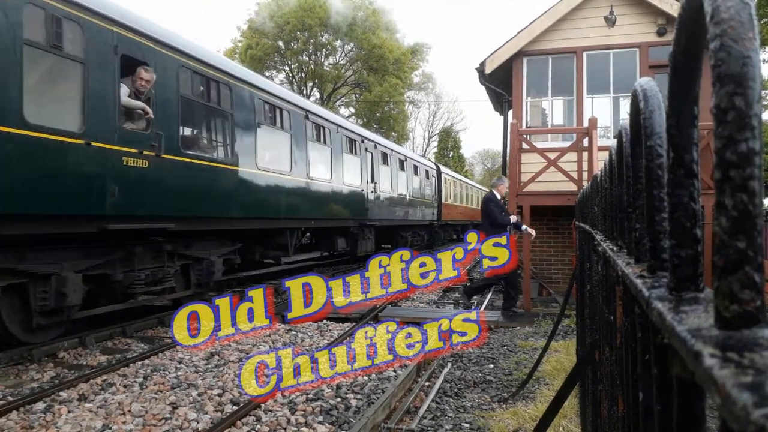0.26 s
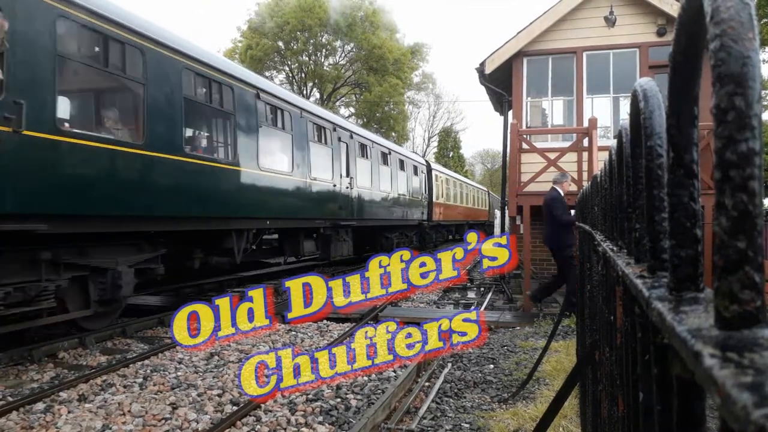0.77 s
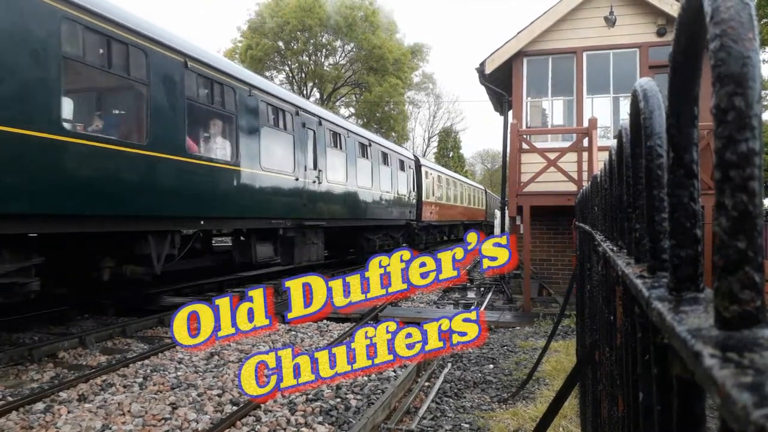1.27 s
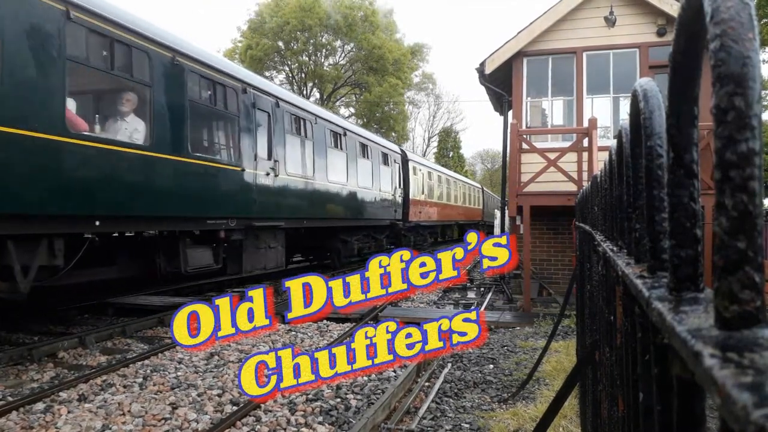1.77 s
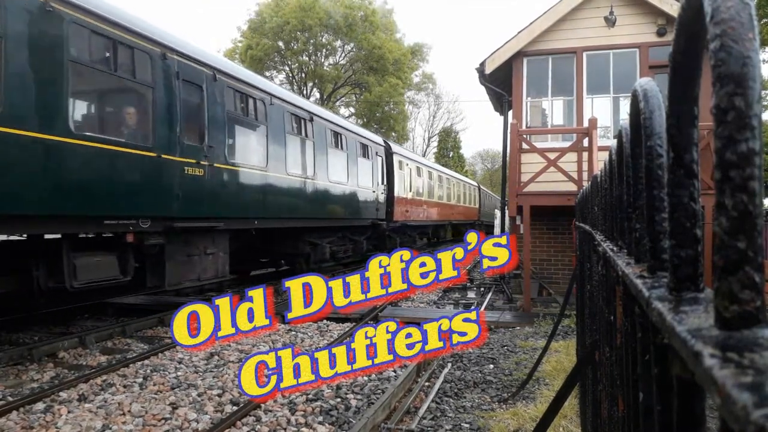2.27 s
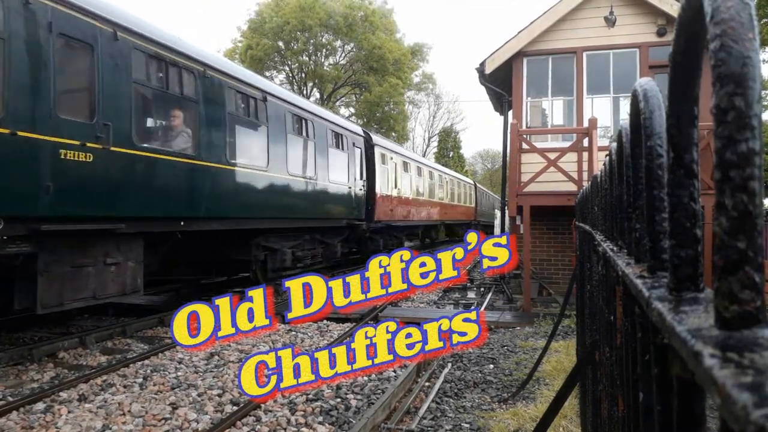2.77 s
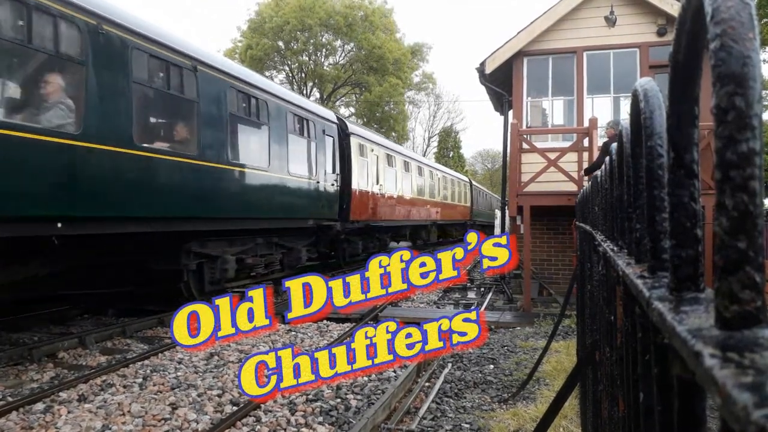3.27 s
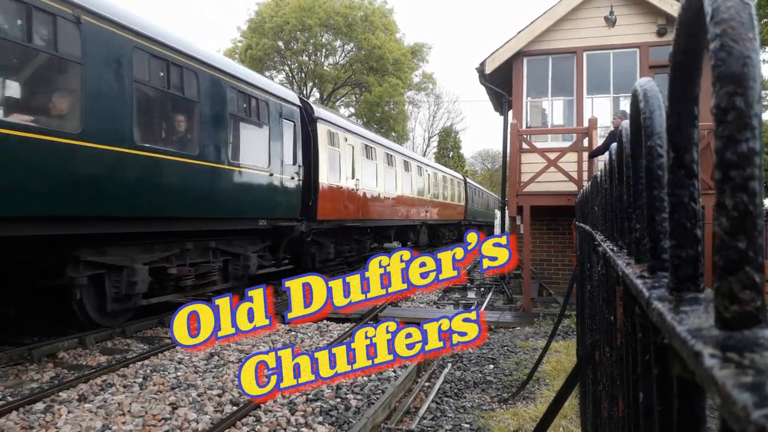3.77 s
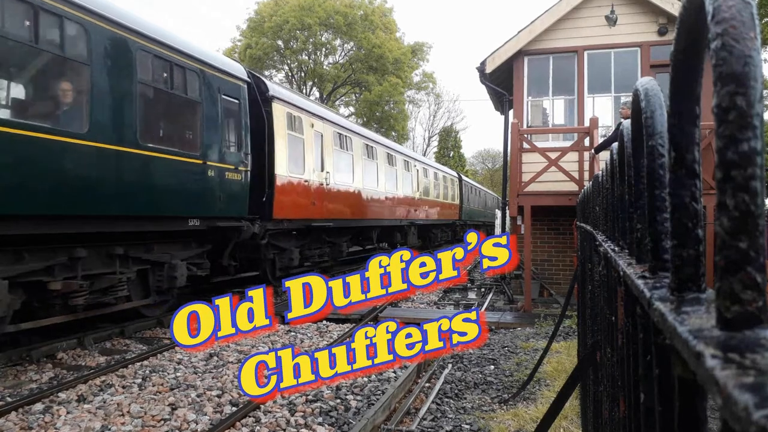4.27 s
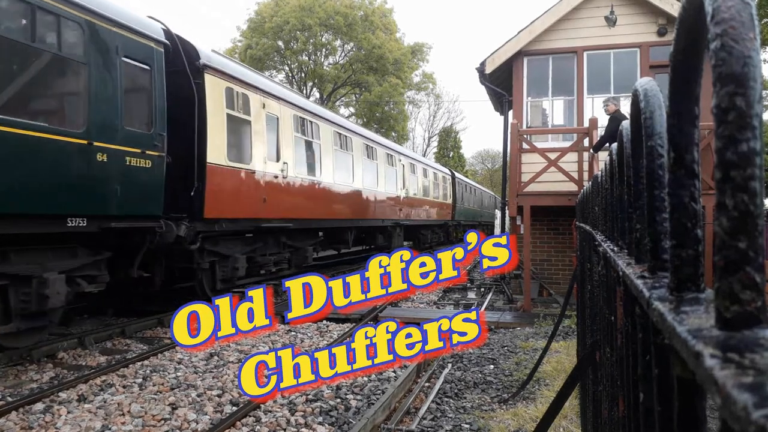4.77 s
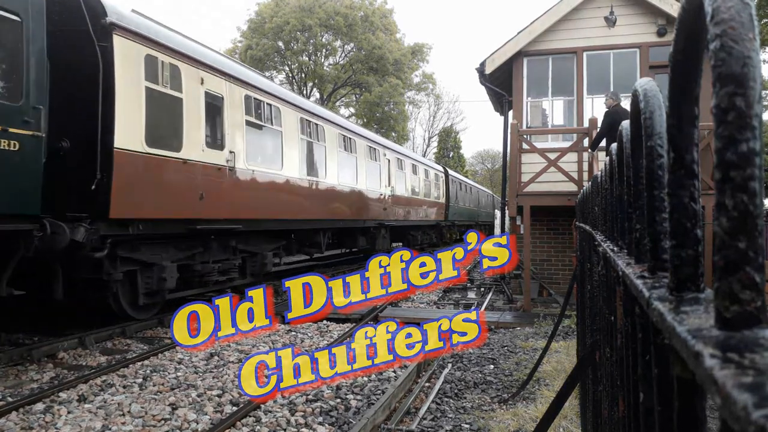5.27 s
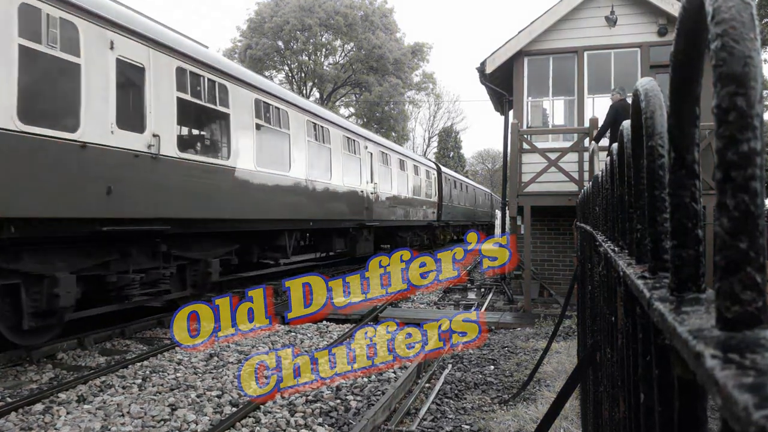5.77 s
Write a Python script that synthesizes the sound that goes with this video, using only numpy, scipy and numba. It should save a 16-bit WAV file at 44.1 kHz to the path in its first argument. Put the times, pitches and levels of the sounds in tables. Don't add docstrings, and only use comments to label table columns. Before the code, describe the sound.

A steam locomotive pulls away with strong, regular chuffs, hissing and booming, gradually growing fainter over the soft rumble of rolling coaches.

```python
import sys
import numpy as np
from scipy import signal
from scipy.fft import rfft, irfft
from scipy.io import wavfile
from scipy.ndimage import uniform_filter1d
from numba import njit

SR = 44100
rng = np.random.default_rng(int(sys.argv[2]) if len(sys.argv) > 2 else 0)


def volts_from_db(level):
    exponent = np.asarray(level, float) / 20
    return 10 ** exponent


def dump(signal):
    limited = np.clip(np.atleast_2d(signal).T, -1, 1)
    pcm = np.round(limited * 32767).astype(np.int16)
    wavfile.write(sys.argv[1], SR, pcm)


N = 265923
T = np.arange(N) / SR

# t/s, roar level/dB, time to full pressure/s, chimney boom/dB and low body/dB relative to the roar
BEATS = [(0.043, -20, 0.077, 2.5, -0.5), (0.333, -21.5, 0.067, 1, -0.2), (0.625, -23.5, 0.061, 4, 0.6),
         (0.898, -23.5, 0.054, -3, -3), (1.16, -22.5, 0.085, -1, -3), (1.448, -22.5, 0.07, -2, -5.5),
         (1.723, -26, 0.081, -2.5, -3), (1.99, -28, 0.073, 0, -2.5), (2.265, -27.5, 0.079, -3, -5.5),
         (2.544, -25.5, 0.07, -12, -1), (2.823, -27, 0.067, -4, -3), (3.073, -28.5, 0.078, -1.5, -1.5),
         (3.346, -29.5, 0.079, -1.5, -1.5), (3.638, -30.5, 0.049, -2, 1.5), (3.898, -34.5, 0.073, 0.5, 0.5),
         (4.128, -41, 0.013, -5, 1.5), (4.165, -36, 0.055, 1, 2), (4.413, -36, 0.077, 0, 1),
         (4.673, -33, 0.084, -4.5, 0), (4.957, -32, 0.067, -7.5, 0), (5.205, -33.5, 0.055, -8, 2),
         (5.416, -32, 0.052, -3.5, 2.5), (5.578, -31.5, 0.059, -4, -0.5), (5.745, -34.5, 0.064, -1.5, -0.5)]
BEAT_S, ROAR_DB, _, BOOM_DB, BODY_DB = np.transpose(BEATS)
STRENGTH_DB = ROAR_DB + 29.5
# f/Hz, width/Hz, level/dB
CHIMNEY = [(242.7, 33.7, 1), (267.2, 29, -4)]
GONE_M = 4.7 * T + 1 * T ** 2 / 2


@njit
def svf(x, hz, width):
    y = np.empty(len(x))
    band, low = 0., 0.
    for i in range(len(x)):
        g = np.pi * hz[i] / SR
        k = width / hz[i]
        v = (band + g * (x[i] - low)) / (1 + g * (g + k))
        band = 2 * v - band
        low += 2 * g * v
        y[i] = k * v
    return y


def unit(x):
    return x / np.sqrt(np.mean(x ** 2))


def filtered(x, order, hz, kind):
    return signal.sosfiltfilt(signal.butter(order, hz, kind, fs=SR, output="sos"), x)


def walk(rate):
    hold = int(SR / rate)
    steps = np.repeat(rng.standard_normal(N // hold + 1), hold)
    slewed = uniform_filter1d(uniform_filter1d(steps, hold), hold)
    return unit(slewed[:N])


def turbulence(spectrum, flicker_db, rate):
    hz = np.maximum(np.arange(N // 2 + 1) * SR / N, 1)
    points = np.array(spectrum, float)
    colour_db = np.interp(np.log(hz), np.log(points[:, 0]), points[:, 1], -90)
    colour = rfft(rng.standard_normal(N)) * volts_from_db(colour_db)
    out = 0
    for step in range(9, 29):
        share = np.clip(1 - np.abs(2 * np.log2(hz) - step), 0, 1)
        out = out + irfft(colour * share, N) * volts_from_db(flicker_db * walk(rate))
    return unit(out)


def pipe(modes, drift, flicker_db):
    out = 0
    for hz, width, db in modes:
        centre = hz * (1 + drift * walk(6))
        swing = np.tanh(0.58 * unit(svf(rng.standard_normal(N), centre, 1. * width)))
        ring = svf(swing, centre, 2. * width)
        out = out + volts_from_db(db + flicker_db * walk(20)) * unit(ring)
    return unit(out)


def blast(layer_db, late=0., stretch=0.96, sharpen=0.98):
    width_s, bluntest = 0.047, 0.9
    out = np.zeros(N)
    t = np.arange(SR // 2) / SR
    for (start, db, rise, *_), extra_db in zip(BEATS, layer_db):
        sharp = max((rise / width_s) ** 2, bluntest)
        u = np.maximum(t - late, 0) / (rise * stretch)
        puff = (u * np.exp(1 - u)) ** (sharp * sharpen) * volts_from_db(db + extra_db)
        i = int(start * SR)
        out[i:i + len(t)] += puff[:N - i]
    return out


def leaking_steam():
    # f/Hz, level/dB per Hz
    leak_colour = [(600, -5.5), (1500, -2), (2400, -3), (3300, -1), (5500, -5.5), (7500, -9.5),
                   (11200, -6.5), (13500, -11.5), (15700, -18)]
    start_m = 13.3
    leak_db = -36.2 - 20 * np.log10(1 + GONE_M / start_m)
    return volts_from_db(leak_db) * turbulence(leak_colour, flicker_db=0.7, rate=16.0)


def rolling_coaches():
    # t/s, level/dB
    passing = [(0, -36), (0.75, -57), (1.15, -35.5), (1.8, -39.5), (2.8, -39.5), (3.85, -38.5), (4.15, -49),
               (4.7, -43), (5.5, -38), (5.75, -42), (5.92, -38), (6.03, -40)]
    # f/Hz, level/dB per Hz
    roll_colour = [(18, -58), (30, -9), (92, -1), (245, 1), (382, -8.5), (540, -6), (642, -9), (962, -14),
                   (1440, -18), (2000, -21), (3000, -42), (3900, -68), (6600, -120)]
    roll_db = np.interp(T, *np.transpose(passing))
    coaches = volts_from_db(roll_db - 2.5) * turbulence(roll_colour, flicker_db=4.0, rate=9)
    coaches = coaches + volts_from_db(roll_db - 9.0) * pipe(CHIMNEY, drift=0.0044, flicker_db=4.0)
    deep = filtered(coaches, 2, 80, "low")
    deep_db = 0.8 * (-43.0 - roll_db) + 3 - 0.1 * GONE_M
    return coaches + (volts_from_db(deep_db) - 1) * deep


@njit
def walls(x, lags, gain, damp):
    line, soft, out = np.zeros((8, 8192)), np.zeros(8), np.zeros(len(x))
    for i in range(len(x)):
        total = 0.
        for k in range(8):
            soft[k] += (1 - damp) * (gain[k] * line[k, (i - lags[k]) & 8191] - soft[k])
            total += soft[k]
        out[i] = total
        for k in range(8):
            line[k, i & 8191] = x[i] + soft[k] - total / 4
    return out


def yard_echo(engine):
    t60_s, damp, level_db = 0.49, 0.54, -18
    lags = rng.integers(900, 4000, 8)
    gain = volts_from_db(-60 * lags / SR / t60_s)
    return volts_from_db(level_db) * walls(engine + 1e-18, lags, gain, damp)


def resonance_flares():
    # t/s, length/s, f/Hz, level/dB
    eddies = [
        (1.212, .014, 1530, -31),
        (2.117, .045, 3120, -41),
        (2.174, 0.031, 247, -31.5),
        (2.335, .015, 3300, -50),
        (2.91, 0.036, 1460, -35.5),
        (5.267, 0.041, 491, -34),
        (5.358, 0.056, 245, -32.5),
        (5.486, 0.047, 470, -37),
        (5.85, 0.027, 260, -44),
    ]
    out = 0
    for s, length, hz, db in eddies:
        swell = volts_from_db(db) * np.exp(-((T - s) / length) ** 2)
        out = out + swell * pipe([(hz, 0.14 * hz, 0)], drift=0.006, flicker_db=1.5)
    return out


def cap_jet():
    # f/Hz, level/dB per Hz
    jet_colour = [(900, -7), (1800, 2), (2400, 0), (3500, -1), (5500, -7.5), (7200, -13.5), (11000, -14.5),
                  (13500, -20.5), (15700, -27)]
    jet = turbulence(jet_colour, flicker_db=0.24, rate=22)
    top = filtered(jet, 2, 7000, "high")
    hiss_db = -7.5 - 0.31 * STRENGTH_DB
    sizzle_db = -18.5 - 0.17 * STRENGTH_DB
    hiss = blast(hiss_db, late=0.0013, stretch=1.093, sharpen=1.0) * unit(jet - top)
    sizzle = blast(sizzle_db, late=0.021, stretch=1.13, sharpen=1.0) * unit(top)
    return hiss + sizzle


def nozzle_whistle():
    # f/Hz, width/Hz, level/dB
    nozzle = [(1549, 105, 7), (3074, 130, -5)]
    whistle_db = -13 + 6 * walk(4.74)[(BEAT_S * SR).astype(int)]
    whistle_db = whistle_db + 50 * np.minimum(BEAT_S - 0.33, 0)
    return blast(whistle_db, late=0.012, stretch=0.5, sharpen=0.9) * pipe(nozzle, drift=0.045, flicker_db=5.5)


def smokebox_roar():
    # f/Hz, width/Hz, level/dB
    smokebox = [(700, 72, -1), (778, 125, -2.5), (848, 102, 1), (1028, 160, 0)]
    blastpipe = [(1171, 210, -1.5), (1400, 220, -1), (1605, 220, -8), (1880, 300, -5.5)]
    bark_db = -5 / (1 + np.exp((T - 2) / 0.49))
    bark_db = bark_db + 2 * np.exp(-((T - 3.1) / 0.7) ** 2)
    shade_db = -1 * np.maximum(T - 4.35, 0) - 0.5 * np.maximum(bark_db, 0)
    box = volts_from_db(shade_db) * pipe(smokebox, drift=0.022, flicker_db=4.0)
    bark = volts_from_db(bark_db) * pipe(blastpipe, drift=0.024, flicker_db=2.1)
    return blast(np.full(len(BEATS), -6.0)) * (box + bark)


def chimney_boom():
    # f/Hz, width/Hz, level/dB
    low_body = [(120, 73, -4.5), (176.3, 28.7, 0.5)]
    upper_stack = [(328.8, 32.3, 4.5), (362, 65, -0.5)]
    throat_modes = [(428.5, 56, -1.5), (511.5, 101, 1), (574, 38, -6)]
    thump_db = -7.5 + 1.3 * BODY_DB
    stack_db = -4.77 + 0.14 * BOOM_DB - 10 * np.maximum(BEAT_S - 4.66, 0)
    thump = blast(thump_db, late=0.0027, stretch=1.17, sharpen=0.88) * pipe(low_body, drift=0.02, flicker_db=0.5)
    boom = blast(BOOM_DB + 0.12, late=0.0097, stretch=1.043, sharpen=1.0)
    boom = boom * pipe(CHIMNEY, drift=0.011, flicker_db=0.0)
    stack = blast(stack_db, late=0.0056, stretch=0.93, sharpen=1.0)
    stack = stack * pipe(upper_stack, drift=0.0052, flicker_db=0.2)
    throat = blast(BODY_DB - 4.0, late=0.0017, stretch=1.0, sharpen=0.99)
    throat = throat * pipe(throat_modes, drift=0.059, flicker_db=2.0)
    return thump + boom + stack + throat


def through_air(heard):
    # t/s, treble level/dB
    clouds = [(0, 0.5), (0.7, -0.5), (1.4, -0.5), (1.85, 1.5), (2.3, 1), (2.9, 0.5), (3.6, 1), (4.1, -1),
              (4.8, 0.5), (5.5, 1), (6.03, -1.5)]
    air_db = 4.5 - 0.16 * GONE_M
    heard = heard + (volts_from_db(air_db) - 1) * filtered(heard, 2, 12500, "high")
    cloud_db = np.interp(T, *np.transpose(clouds))
    return heard + (volts_from_db(cloud_db) - 1) * filtered(heard, 1, 6500, "high")


def scene():
    background = leaking_steam() + rolling_coaches()
    engine = resonance_flares() + cap_jet() + nozzle_whistle() + smokebox_roar() + chimney_boom()
    heard = through_air(engine + yard_echo(engine) + background)
    return np.tile(heard, (2, 1))


def top_cut(x):
    return signal.sosfilt(signal.butter(12, 17040, fs=SR, output="sos"), x)


def record(dry):
    dry = signal.sosfilt(signal.butter(2, 60, "high", fs=SR, output="sos"), dry)
    dry = np.tanh(1.3 * dry) / 1.3
    dry = signal.sosfilt(signal.ellip(12, .3, 80, 15750, fs=SR, output="sos"), dry)
    return top_cut(dry)


dry = scene()
out = record(dry)
dump(out)
```